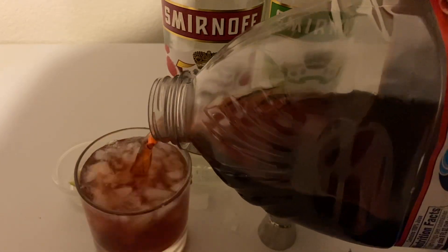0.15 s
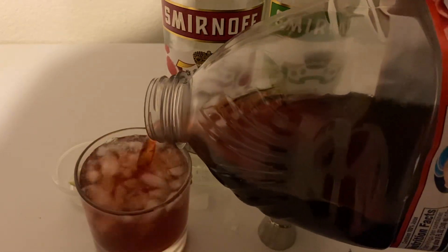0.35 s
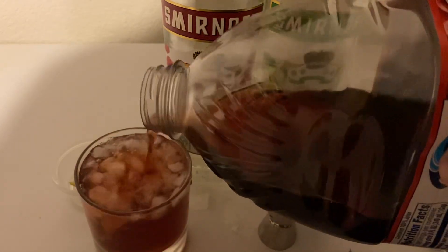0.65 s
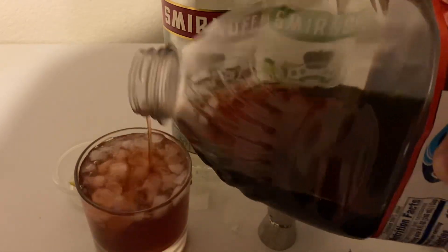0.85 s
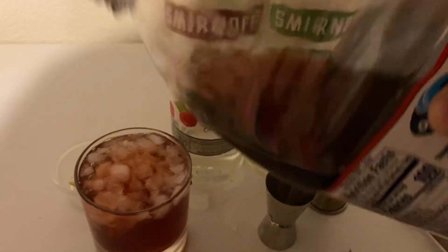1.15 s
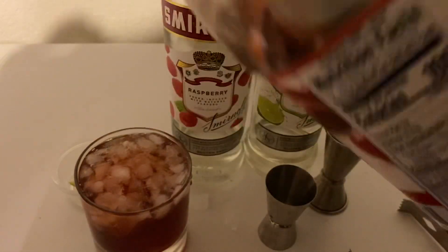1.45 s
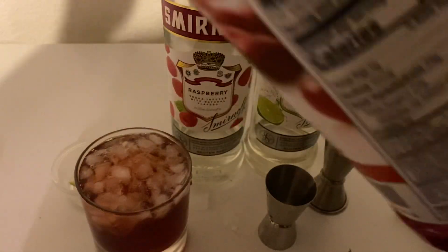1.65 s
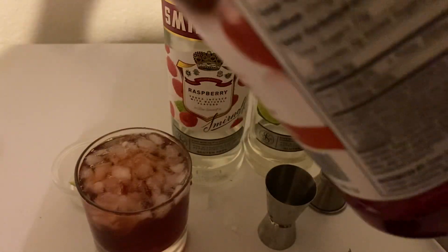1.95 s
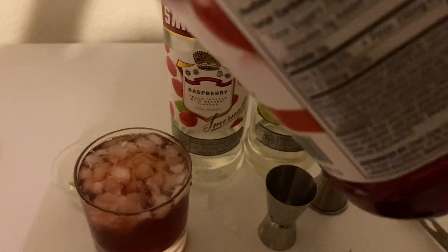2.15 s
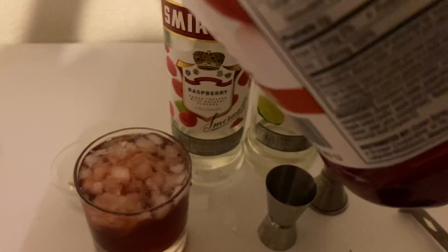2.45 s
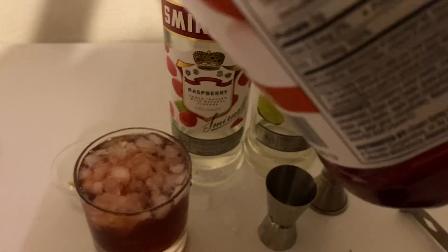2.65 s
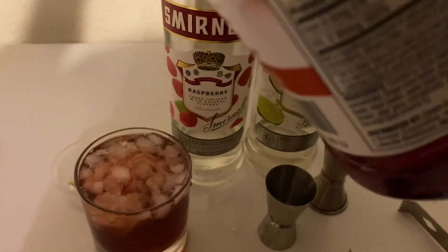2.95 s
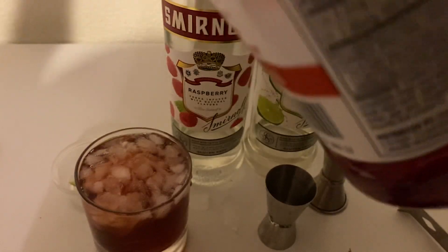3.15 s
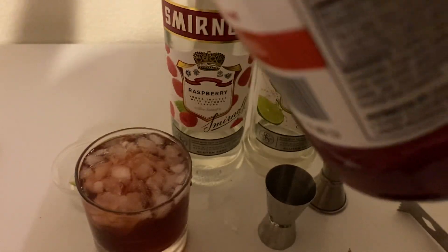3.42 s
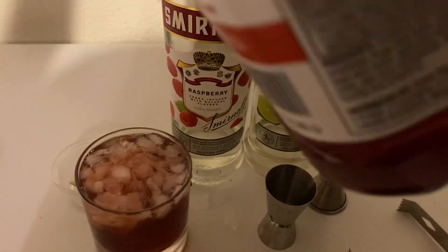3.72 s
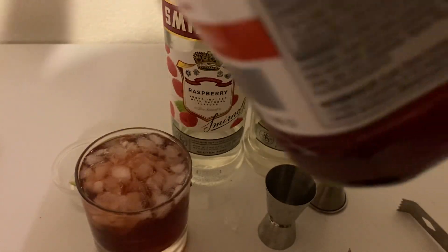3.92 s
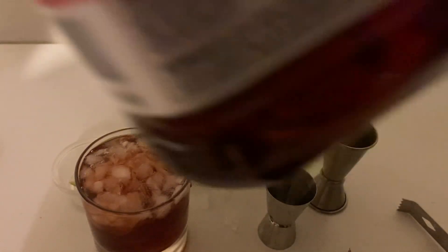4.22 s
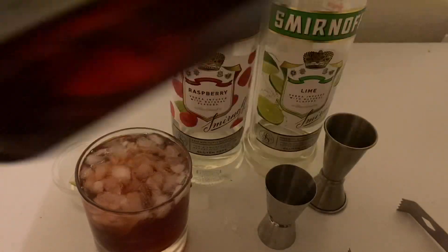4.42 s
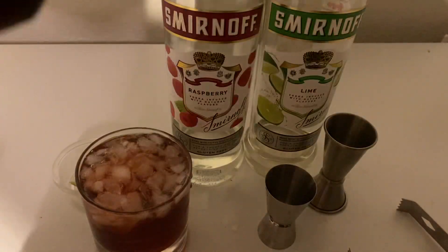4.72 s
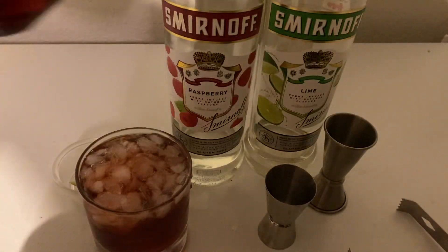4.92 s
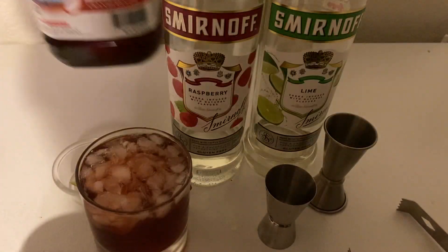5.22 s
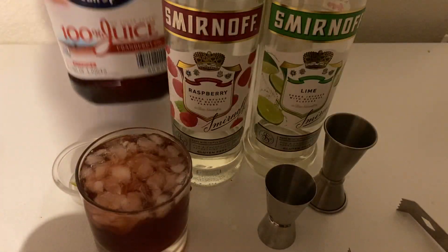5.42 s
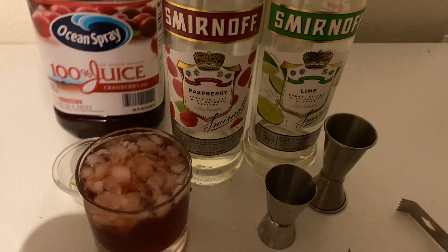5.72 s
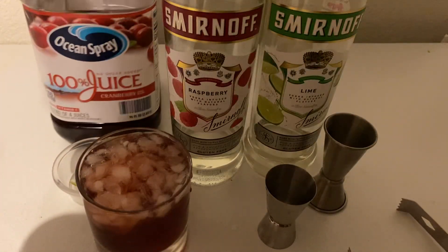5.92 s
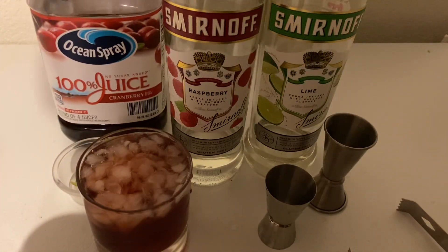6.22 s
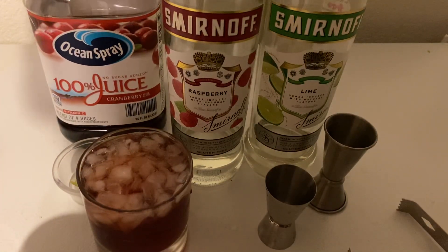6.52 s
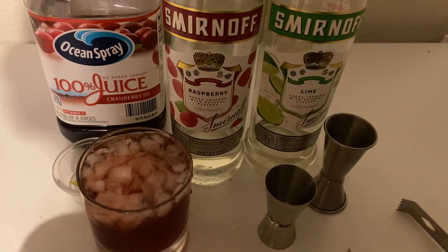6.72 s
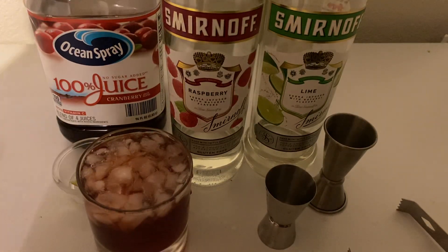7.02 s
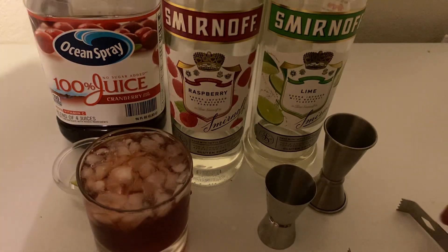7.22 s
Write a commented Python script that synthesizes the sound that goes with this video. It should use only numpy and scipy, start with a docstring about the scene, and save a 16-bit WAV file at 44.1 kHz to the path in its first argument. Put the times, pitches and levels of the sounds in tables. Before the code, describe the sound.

Close up in a quiet home kitchen, the end of a juice pour fizzes and trickles over crushed ice, thinning into scattered drips. A cap is screwed onto a large plastic bottle with scraping rubs, hollow knocks and crackles. The bottle swishes past and lands softly on the counter, then glass clinks lightly on glass several times. A refrigerator hums faintly beneath, in stereo with short reflections.

```python
"""Juice over ice

Juice trickles over crushed ice in a glass and stops: swarms of ringing bubbles, hiss and gliding tones.
The cap is screwed back on the plastic bottle: short rubs ring its wall, belly and cap modes.
The bottle is carried off and set down, with lumpy rumble and swishing noise as it moves.
Glass clinks on glass as decaying modes over dull ticks. A quiet kitchen hums below and reflects it all.
"""
import sys
import numpy as np
from scipy import signal
from scipy.fft import rfft, irfft, next_fast_len
from scipy.io import wavfile

SR = 44100
rng = np.random.default_rng(int(sys.argv[2]) if len(sys.argv) > 2 else 0)


def voltage_ratio(level):
    """Linear amplitude factor for a level in decibels (scalar or array-like)."""
    return 10 ** (np.asarray(level, float) / 20)


def dump(signal):
    """Clip the signal to [-1, 1] and save it as 16-bit WAV at the path in sys.argv[1]."""
    limited = np.clip(np.atleast_2d(signal).T, -1, 1)
    pcm = np.round(limited * 32767).astype(np.int16)
    wavfile.write(sys.argv[1], SR, pcm)


N = 325017


def rms_one(x):
    """Scales to rms 1."""
    return x / np.sqrt(np.mean(x ** 2) + 1e-20)


def in_time(rows):
    """Curve columns at every sample, after a gate that is open while the curve lasts."""
    s, *columns = np.transpose(rows)
    t = np.arange(N) / SR
    running = s[0] < .02      # a curve that begins with the scene needs no fade-in
    gate = np.clip(np.minimum(t - s[0] + running, s[-1] - t) / .05, 0, 1)
    return [gate] + [np.interp(t, s, c) for c in columns]


def at_hz(points, hz, column=1):
    """Reads a table on a log-frequency axis."""
    points = np.array(points)
    return np.interp(np.log(hz + 1), np.log(points[:, 0]), points[:, column])


def drift(rate_hz):
    """Slow random wander of rms 1, smoothed by two equal poles at every 40th sample."""
    r = np.exp(-80 * np.pi * rate_hz / SR)
    slow = signal.lfilter([1], [1, -2 * r, r * r], rng.standard_normal(N // 40 + 2002))[2000:]
    return np.interp(np.arange(N) / 40, np.arange(len(slow)), rms_one(slow))


def ring(force, hz, t60):
    """A resonant mode: a unit click sets a decaying sine of height 1 ringing."""
    r, w = voltage_ratio(-60 / (t60 * SR)), 2 * np.pi * hz / SR
    return signal.lfilter([0, np.sin(w)], [1, -2 * r * np.cos(w), r * r], force + 1e-18)


def softer(x, cut_hz):
    """A yielding contact feeds little treble."""
    return signal.sosfilt(signal.butter(2, cut_hz, fs=SR, output="sos"), x)


def without_bass(x, cut_hz, order=2):
    """Small bodies and damped ones radiate little below the cut."""
    return signal.sosfilt(signal.butter(order, cut_hz, "high", fs=SR, output="sos"), x)


def shaped(spectrum, alike=None):
    """Stereo noise of a given colour and left-right likeness; rms 1."""
    size = next_fast_len(N)
    mid, side = rfft(rng.standard_normal((2, size)))
    hz = np.arange(len(mid)) * SR / size
    like = 1 if alike is None else np.clip(at_hz(alike, hz), 0, 1)
    pair = np.sqrt(1 + like) * mid + np.sqrt(1 - like) * side * [[1], [-1]]
    return rms_one(irfft(pair * voltage_ratio(at_hz(spectrum, hz)), size)[:, :N])


def ports(x, toward):
    """Left and right each get their own level and phase, as two microphone ports hear a source."""
    size = next_fast_len(N + 4096)
    hz = np.arange(size // 2 + 1) * SR / size
    half = voltage_ratio(at_hz(toward, hz) / 2) * np.exp(-.5j * at_hz(toward, hz, column=2))
    pair = np.array([half, 1 / half]) * 2 / (abs(half) + 1 / abs(half))
    return irfft(rfft(x, size) * pair, size)[:, :N]


# colour of the air noise: f/Hz, relative level/dB
AIR_COLOUR = [(12, -59), (20, -44), (43, -11), (65, -13), (124, -12.5), (195, -17.5), (393, -20),
              (729, -24.5), (1050, -35.5), (1740, -40.5), (2180, -28), (2730, -37), (4000, -42),
              (6900, -42), (10000, -39.5), (15600, -56.5), (16400, -98)]
# how alike left and right are in that noise: f/Hz, likeness 0 to 1
AIR_LIKENESS = [(60, 0.82), (150, 0.48), (380, 0.71), (950, 0.092), (2400, 0.2), (6000, 0.8), (9000, 0.19)]
# compressor buzz on multiples of the running speed: multiple, level/dB
COMPRESSOR_BUZZ = [(1, -65), (36, -86), (37, -84), (40, -91), (42, -89), (43, -93), (44, -94), (53, -91),
                   (54, -90), (56, -95), (79, -96), (115, -98)]
# air noise resonances of the refrigerator: f/Hz, width/Hz, level/dB
FRIDGE_HUM = [(62.8, 25, -63.5), (120.4, 39, -63.5), (176.36, 7.7, -65), (2240, 120, -99),
              (3208, 55, -86.5), (4620, 90, -87.5)]


def room_tone():
    """Dull air noise with a refrigerator's wavering motor harmonics and narrow noise resonances."""
    motor_hz = 58.93
    out = voltage_ratio(-62.5 + 0.13 * drift(9.7)) * shaped(AIR_COLOUR, AIR_LIKENESS)
    for multiple, db in COMPRESSOR_BUZZ:
        phase = 2 * np.pi * (multiple * motor_hz * np.arange(N) / SR + rng.random())
        out += voltage_ratio(db + 4.0 * drift(1.5)) * np.sqrt(2) * np.sin(phase)
    for hz, width_hz, db in FRIDGE_HUM:
        white = rng.standard_normal(N) + 0.25 * rng.standard_normal((2, N))
        out += voltage_ratio(db) * rms_one(ring(white, hz, 4.9 / width_hz))
    return out


def kitchen(x):
    """Dense reflections: noise dying away, the treble sooner, partly shared by both sides."""
    t60_s, treble_t60_s, wall_cut_hz = 0.24, 0.12, 3500
    t = np.arange(int(.5 * SR)) / SR
    noise = rng.standard_normal(len(t)) + 1.5 * rng.standard_normal((2, len(t)))
    dull = signal.sosfilt(signal.butter(1, wall_cut_hz, fs=SR, output="sos"), noise)
    tail = dull * voltage_ratio(-60 * t / t60_s) + (noise - dull) * voltage_ratio(-60 * t / treble_t60_s)
    tail *= np.clip(t / .003 - .5, 0, 1)      # a short gap before the reflections
    return signal.fftconvolve(x[None], tail / np.sqrt(np.sum(tail ** 2) / 2), axes=1)[:, :N]


# liquid sloshing and hands on the bottle, one curve per stretch: t/s, motion level/dB
MOTION = [
    [(1.5, -80), (2.05, -62), (2.45, -67), (2.78, -54), (3.37, -64.5), (3.55, -69), (4.2, -62), (4.29, -53),
     (4.8, -78.5)],
    [(5.75, -86), (6.096, -61), (6.55, -64)],
]
# colour of the swish: f/Hz, relative level/dB
SWISH_COLOUR = [(110, -26), (180, -6), (205, -6.5), (345, -6), (501, -11.5), (566, -19.5), (697, -16),
                (1180, -28), (1800, -27.5), (2500, -43), (5500, -120)]
# the bottle brushes past: t of peak/s, level/dB
BRUSHES = [(5.07, -60), (5.14, -49.5), (5.33, -62)]


def handling():
    """Lumpy rumble and a soft swish while the bottle is moved, and swelling brushes of the same swish."""
    swell_s, fade_s = 0.074, 0.073      # time from and to 8.7 dB under the peak
    rumble_colour = [(30, -39), (50, 11), (90, 9.5), (200, -4.5), (320, -44.5), (700, -99)]
    rumble = voltage_ratio(5.9 * drift(12.3)) * shaped(rumble_colour)[0]
    swish, t = shaped(SWISH_COLOUR)[0], np.arange(N) / SR
    passing = np.zeros(N)
    for s, db in BRUSHES:
        passing += voltage_ratio(db) * np.exp(-((t - s) / np.where(t < s, swell_s, fade_s)) ** 2)
    out = passing * voltage_ratio(0.5 * drift(60)) * swish
    moved = rumble + swish * voltage_ratio(-1.5 + 1.9 * drift(36))
    for rows in MOTION:
        gate, motion_db = in_time(rows)
        out += gate * voltage_ratio(motion_db) * moved
    return out


def struck(modes, times, length_s, level_db):
    """Each contact is a short run of uneven slips; level_db holds its strength in every mode."""
    t, out = np.arange(2048) / SR, np.zeros(N)
    shape = (len(times), len(t))
    slips = rng.standard_normal(shape) * voltage_ratio(2.33 * rng.standard_normal(shape))
    span = t / np.clip(length_s, .0002, .02) + np.zeros((len(times), 1))
    slips *= span ** 2 * np.exp(-4.0 * span)      # the rub swells quickly and dies
    typical = np.sqrt(np.sum(slips ** 2, axis=1))
    for k, (hz, db, t60) in enumerate(modes):
        # what this mode takes up, to even out its response
        felt = 1.08 * abs(slips @ np.exp(2j * np.pi * hz * t)) + .4 * typical
        force = np.zeros(N)
        for s, slip, gain in zip(times, slips, voltage_ratio(db + level_db[:, k]) / felt):
            force[round(s * SR):][:len(t)] += gain * slip
        out += ring(force, hz, t60)
    return out


# modes of the bottle's belly: f/Hz, level/dB, t60/s
BELLY_MODES = [(70.3, -9, 1), (95.3, -6, 0.15), (142.7, 0, 0.09), (177.8, -11.5, 0.12)]
# modes of its wall: f/Hz, level/dB, t60/s
WALL_MODES = [(275.5, -2.5, 0.037), (331, -12.5, 0.095), (412, 1, 0.063), (479, -8.5, 0.14),
              (607, 5.5, 0.02), (738, -5.5, 0.071), (1017, -15, 0.054)]
# modes of its cap: f/Hz, level/dB, t60/s
CAP_MODES = [(1240, -24, 0.016), (1548, -3.5, 0.013), (1823, 4.5, 0.0067), (2049, 0, 0.011),
             (2500, -4.5, 0.0095), (3094, -4.5, 0.016), (3900, -40, 0.004)]


def contacts(s, rub_s, wall_db, belly_db, cap_db, wall_hz, wall_cut_hz):
    """One kind of contact sets wall, belly and cap ringing; its place favours wall modes near wall_hz."""
    favour_db = -20.0 * abs(np.log2(np.array(WALL_MODES)[:, 0] / wall_hz[:, None]))
    belly_scatter_db = rng.normal(-1.2, 0.28, (len(s), len(BELLY_MODES)))
    cap_scatter_db = 2.5 * rng.standard_normal((len(s), len(CAP_MODES)))
    wall = struck(WALL_MODES, s, rub_s, wall_db[:, None] - 2.5 + favour_db)
    belly = struck(BELLY_MODES, s, rub_s, belly_db[:, None] + belly_scatter_db)
    cap = struck(CAP_MODES, s, rub_s, cap_db[:, None] + cap_scatter_db)
    return softer(wall, wall_cut_hz) + softer(belly, 350) + softer(cap, 8700)


# knocks and rubs: t/s, wall level/dB, belly level/dB, cap level/dB, most excited wall f/Hz
BOTTLE_KNOCKS = [(1.719, -17.5, -27, -40, 412), (1.777, -22, -48, -42, 776), (1.805, -40, -34, -59, 486),
                 (1.953, -21, -64, -33, 755), (2.04, -27, -25, -43, 760), (2.051, -26.5, -47, -44, 390),
                 (2.074, -37, -32, -47.5, 471), (2.092, -31, -66, -43, 705), (2.106, -26.5, -33, -41, 334),
                 (2.118, -35, -27, -70, 304), (2.196, -30.5, -66, -51, 296), (2.209, -29, -32, -37.5, 450),
                 (2.499, -26, -36, -48, 383), (2.508, -28, -54, -44.5, 610), (2.517, -37.5, -43, -57, 486),
                 (2.524, -22.5, -28, -42.5, 271), (2.582, -33.5, -51, -61, 313),
                 (2.611, -27, -34, -56.5, 450), (2.683, -23, -29.5, -39, 310),
                 (2.694, -24.5, -70, -42.5, 444), (2.719, -36, -68, -55, 487),
                 (2.896, -33.5, -52, -51, 476), (2.943, -31.5, -51, -54, 467), (3.067, -37, -60, -53, 400),
                 (3.105, -39, -48, -39, 281), (3.135, -17, -72, -24.5, 479),
                 (3.176, -23.5, -70, -31.5, 500), (3.193, -33.5, -62, -40.5, 423),
                 (3.353, -19.5, -43, -32.5, 383), (3.366, -19.5, -40, -35, 734),
                 (3.379, -18, -31, -25.5, 738), (3.405, -27.5, -37, -62, 440),
                 (3.452, -29.5, -38, -55, 290), (3.473, -26, -45, -42, 405), (3.485, -56, -55, -36, 412),
                 (3.734, -48, -29, -52, 250), (3.821, -34.5, -47, -57, 270), (3.836, -38, -47, -56, 514),
                 (3.938, -32.5, -54, -65, 299), (3.956, -26, -41, -53, 364), (4.155, -35.5, -51, -46, 523),
                 (4.208, -38, -64, -44, 476), (4.226, -46, -37, -44, 478), (4.245, -27.5, -32.5, -47, 503),
                 (4.32, -22.5, -53, -41, 626), (4.343, -15, -62.5, -44, 233),
                 (4.366, -18.5, -28.5, -52, 260), (4.392, -28, -49, -60, 250), (4.427, -24, -39, -60, 272)]
# the base lands on the counter: t/s, belly level/dB, wall over belly level/dB
COUNTER_LANDINGS = [(5.879, -21, 5.5), (5.918, -27, -35), (6.004, -37.5, -3), (6.385, -28.5, 4)]
# bright crackles of the flexing plastic: t/s, level/dB, most excited f/Hz
PLASTIC_CRACKLES = [(1.4494, -28.5, 5170), (1.7197, -17, 3100), (1.7774, -43, 3210), (1.954, -35.5, 2910),
                    (3.131, -36, 3300), (3.1784, -36, 2710), (3.3822, -32, 2560), (3.49, -42, 2800),
                    (3.494, -45, 3000), (3.498, -36.5, 3250), (4.154, -42, 2920), (4.208, -36, 2700),
                    (4.245, -29.5, 2690), (4.316, -31, 5740), (4.3208, -24.5, 6500), (4.3427, -25.5, 6670),
                    (4.365, -30, 4760), (4.373, -19.5, 2870), (4.398, -25, 2560), (4.4193, -24, 6600),
                    (4.4218, -19, 6500), (4.6793, -56, 4600), (5.874, -53, 3150), (6.204, -42, 2500)]
# modes of the crackles: f/Hz, level/dB, t60/s
CRACKLE_MODES = [(930, -40, 0.002), (1860, -2, 0.0045), (3580, -20.5, 0.021), (4600, -17, 0.0014),
                 (6500, 8, 0.00086), (8620, 2.5, 0.009), (9740, 1, 0.0017), (13500, -12, .002)]


def bottle():
    """Knocks and landings ring belly, wall and cap; the flexing plastic snaps in brighter, shorter modes."""
    s, wall_db, belly_db, cap_db, wall_hz = np.transpose(BOTTLE_KNOCKS)
    rub_s = 0.0098 * np.exp(-0.03 * (np.maximum(wall_db, cap_db) + 25.5))      # gentler knocks drag longer
    out = contacts(s, rub_s[:, None], wall_db, belly_db, cap_db, wall_hz, wall_cut_hz=1550)

    s, belly_db, over_db = np.transpose(COUNTER_LANDINGS)
    wall_db = belly_db + over_db
    landing = contacts(s, 0.016, wall_db, belly_db, cap_db=wall_db - 25,
                       wall_hz=np.full(len(s), 260), wall_cut_hz=2700)
    out += without_bass(landing, 110)      # resting on the counter damps the deepest belly modes

    s, db, snap_hz = np.transpose(PLASTIC_CRACKLES)
    favour_db = -8.0 * abs(np.log2(np.array(CRACKLE_MODES)[:, 0] / snap_hz[:, None]))
    scatter_db = rng.normal(1.0, 1.0, (len(s), len(CRACKLE_MODES)))
    out += struck(CRACKLE_MODES, s, 0.0027, db[:, None] + favour_db + scatter_db)
    return without_bass(out, 55)      # too small to radiate deep bass


# glass against glass: t/s, level/dB, tick over ring level/dB
GLASS_TOUCHES = [(6.3404, -42.5, -5), (6.5777, -25, -10.5), (6.6713, -29, -9), (6.7557, -27, -9),
                 (6.9112, -36.5, -8), (6.9401, -36, -6), (6.972, -69, 17), (7.1371, -33, -8),
                 (7.1914, -32, -10.5), (7.357, -51, -6)]
# modes of the glass: f/Hz, level/dB, t60/s
GLASS_MODES = [(2164, 0, .33), (2292, -2, .3), (3804, -13, .15), (4263, -10.5, .11), (5300, -25, .05),
               (5911, -25, .07), (6304, -23, .07), (7068, -23, .12), (7327, -27, .08), (7714, -24, .08),
               (8600, -26, .05), (9650, -25, .04), (10500, -28, .05), (11560, -28, .05)]


def clinks():
    """Hard touches ring the glass modes over a short dull tick; harder ones are brighter."""
    s, touch_db, tick_db = np.transpose(GLASS_TOUCHES)
    at, out = np.round(s * SR).astype(int), np.zeros(N)
    for hz, db, t60 in GLASS_MODES:
        clicks = np.zeros(N)
        upper_db = (3.5 + 0.57 * (touch_db + 30)) * (hz > 3000)
        clicks[at] = voltage_ratio(touch_db - 9.0 + db + upper_db + rng.normal(0, 1.5, len(at)))
        out += ring(clicks, hz, t60)
    clicks = np.zeros(N)
    clicks[at] = voltage_ratio(touch_db + tick_db + 5.0)
    clicks = softer(clicks, 3850)
    tick_modes = [(1310, -12.5, 0.018), (1683, 1.0, 0.0082), (5460, -9.5, 0.0069), (6950, -1.5, 0.019)]
    out += sum(voltage_ratio(db) * ring(clicks, hz, t60) for hz, db, t60 in tick_modes)
    return without_bass(out, 950, order=4)      # small glass radiates no bass


# air pockets between the ice: t/s, length/s, from f/Hz, to f/Hz, level/dB
AIR_POCKETS = [(0.0, 0.055, 1590, 2560, -56), (0.058, 0.17, 1325, 1510, -55),
               (0.249, 0.046, 3010, 3540, -57), (0.31, 0.19, 6600, 7000, -56.5),
               (0.419, 0.045, 2500, 3470, -51), (0.431, 0.053, 4040, 4600, -54.5),
               (0.531, 0.039, 1417, 1474, -56.5)]


def gurgles():
    """Pockets of air between the ice sing and glide as they fill, fluttering while they swell and fade."""
    out, flutter = np.zeros(N), drift(150)
    for s, length, from_hz, to_hz, db in AIR_POCKETS:
        i, along = round(max(s, 0) * SR), np.linspace(0, 1, int(length * SR))
        tone = np.sin(2 * np.pi * np.cumsum(from_hz + (to_hz - from_hz) * along) / SR)
        swell = np.sqrt(np.sin(np.pi * along) + 1e-9)
        out[i:i + len(along)] += voltage_ratio(db) * (0.13 + flutter[i:i + len(along)]) * swell * tone
    return out


# the flow: t/s, splash level/dB, air column f/Hz
FLOW = [(0.0, -57, 718), (0.312, -54.5, 746), (0.5, -57.5, 1016), (0.7, -61.5, 1156), (1.198, -70.5, 1240),
        (1.5, -78, 1250)]
# colour of the splash: f/Hz, relative level/dB
SPLASH_COLOUR = [(530, -44), (900, -18), (1390, -15.5), (2120, -14.5), (2600, -7), (2830, -3), (5550, -2),
                 (7400, -3.5), (8660, 7), (10100, 1.5), (16000, -47)]
# loudest bubbles and ice ticks: t/s, level/dB, f/Hz
LOUD_BUBBLES = [(0.0616, -35.5, 2550), (0.1123, -34.5, 3540), (0.1136, -29, 2600), (0.1534, -32, 1540),
                (0.2093, -31.5, 7000), (0.2683, -39, 3430), (0.32, -32.5, 6600), (0.369, -32.5, 6500),
                (0.4102, -26.5, 7000), (0.4189, -24.5, 7470), (0.489, -31, 4760), (0.5345, -41, 4180),
                (0.5605, -36.5, 4300), (0.626, -36, 7150), (0.6716, -40, 3400), (0.682, -37.5, 4400),
                (0.7644, -43, 2580), (0.7645, -43, 4120), (0.9183, -39, 6800), (0.9574, -47.5, 3500),
                (1.0082, -40, 6950), (1.021, -45, 1480), (1.115, -49, 1460), (1.2181, -49.5, 3530),
                (1.282, -53, 3430), (1.332, -53.5, 3900), (1.4034, -52, 3130)]


def pour():
    """Swarming small bubbles on a splash, the air above the drink singing, and single larger bubbles."""
    gate, splash_db, air_hz = in_time(FLOW)
    # the air column weakens as it shortens
    air_db = splash_db - 9 - 16 * np.log2(air_hz / air_hz[0])

    sizes = voltage_ratio(5.35 * np.minimum(rng.exponential(1, N), 5)) * rng.choice([-1, 1], N)
    # each pitch comes in swarms, around 330 births a second
    born = rng.random((16, N)) < [330 * voltage_ratio(6.0 * drift(14)) / SR for k in range(16)]
    fizz = np.zeros(N)
    for k, hz in enumerate(np.geomspace(1300, 14000, 16)):
        fizz += voltage_ratio(at_hz(SPLASH_COLOUR, hz)) * ring(sizes * born[k], hz, 32.0 / hz)

    # the smooth hiss dies faster than the bubbles as the flow thins
    hiss_db = -6 + splash_db - splash_db[0] + 2.0 * drift(33)
    splash = voltage_ratio(1.0) * rms_one(fizz) + voltage_ratio(hiss_db) * shaped(SPLASH_COLOUR)[0]
    air = np.sin(2 * np.pi * np.cumsum(air_hz) / SR) * drift(45) * np.sqrt(2)
    out = gate * (voltage_ratio(splash_db) * splash + voltage_ratio(air_db) * air)

    for s, db, hz in LOUD_BUBBLES:
        t60 = 0.009 * (4000 / hz) ** .5      # big low bubbles ring longer
        t = np.arange(min(int(t60 * SR), 2048)) / SR
        pitch = hz * (1 + 2.5 * t)      # a bubble near the surface rises in pitch
        rise = 1 - np.exp(-t / 0.00034)
        grit = .5 * rng.standard_normal(len(t)) * np.exp(-t / 0.0085)
        burst = np.sin(2 * np.pi * np.cumsum(pitch) / SR) + grit
        i = round(s * SR)
        out[i:i + len(t)] += voltage_ratio(db - 60 * t / t60) * rise * burst
    return out


# the two microphone ports towards each source: f/Hz, left over right level/dB, right lead/rad
GLASS_SIDE = [(200, -11, 0), (850, 7, -1.8), (1650, 7, -1.64), (3400, 4, -0.78), (6650, 3.5, 1)]
# towards the bottle: f/Hz, left over right level/dB, right lead/rad
BOTTLE_SIDE = [(79, 4.5, -0.26), (395, 3.5, -0.76), (796, 11, -0.65), (1300, -1.5, -0.83), (1590, 2, -2.04),
               (2480, 8, 0.71), (4800, -1, 1.3), (7550, 39, 1.8)]
# towards the clinks: f/Hz, left over right level/dB, right lead/rad
CLINK_SIDE = [(1200, 4, 1.52), (2390, -1, -0.85), (3820, 7, -1.9), (4470, 0, 2.6), (6430, 5, -3.5),
              (7940, 12, -4.5)]
# towards the room: f/Hz, left over right level/dB, right lead/rad
ROOM_SIDE = [(202, 0.5, 0.11), (1200, 0, -1.42), (2400, 3.5, -0.29), (3400, 3.5, -0.98), (4700, 3.5, 1),
             (7000, 1, 1)]


def scene():
    """Near sources reach the two ports directly and by way of the room."""
    drink, plastic, glass = pour() + gurgles(), bottle() + handling(), clinks()
    direct = ports(drink, GLASS_SIDE) + ports(plastic, BOTTLE_SIDE) + ports(glass, CLINK_SIDE)
    reflected = voltage_ratio(-9) * kitchen(drink + plastic + glass)
    return direct + ports(reflected + room_tone(), ROOM_SIDE)


# stepped left-right phase, with level stretches between rises: f/Hz, left over right level/dB, right lead/rad
STEPPED_PHASE = [(7500, 0, 0), (8050, 0, 1.0), (8350, 0, np.pi), (9600, 0, np.pi), (9900, 0, 4.6),
                 (12200, 0, 7.3), (12450, 0, 3 * np.pi), (13800, 0, 3 * np.pi), (14100, 0, 11.3),
                 (16000, 0, 12.5)]


def step_phase(x):
    """Left-right phase rises in steps through the treble; the sides are opposed near 9 and 13 kHz."""
    return ports(x, STEPPED_PHASE)


def roll_off(x):
    """The treble ends steeply here."""
    return signal.sosfilt(signal.butter(12, 17040, fs=SR, output="sos"), x)


def record(dry):
    """The treble is largely merged, cut at 16.6 kHz and turned in phase between the sides."""
    size = next_fast_len(N)
    sides, hz = rfft(dry, size), np.arange(size // 2 + 1) * SR / size
    shared = np.clip((hz - 5800) / 1200, 0, .93)
    blended = sides + shared * (np.mean(sides, axis=0) - sides)
    merged = irfft((hz < 16600) * blended, size)[:, :N]
    return roll_off(step_phase(merged))


dry = scene()
out = record(dry)
dump(out)
```